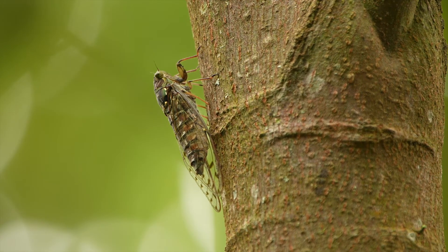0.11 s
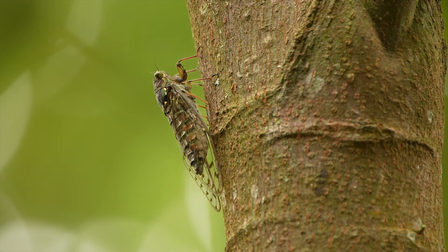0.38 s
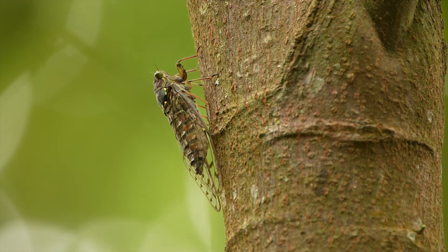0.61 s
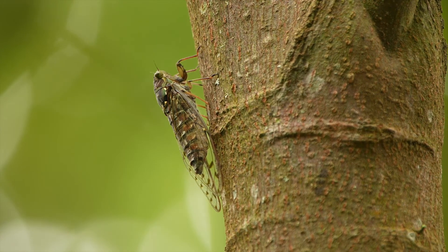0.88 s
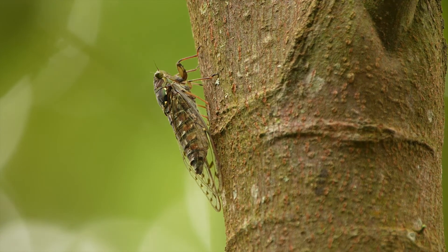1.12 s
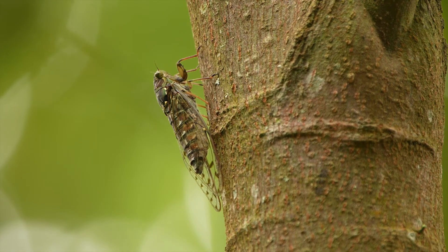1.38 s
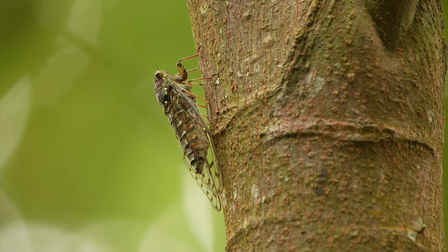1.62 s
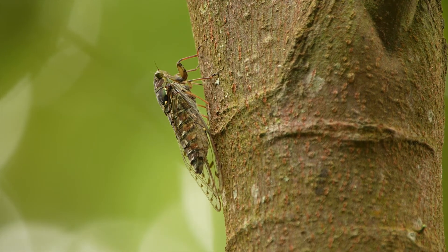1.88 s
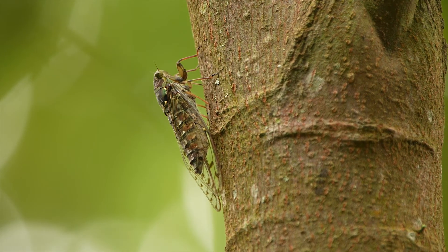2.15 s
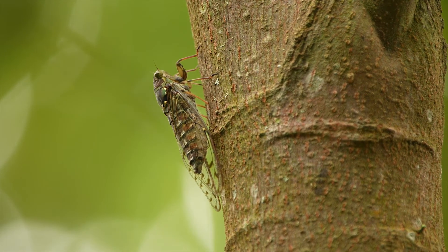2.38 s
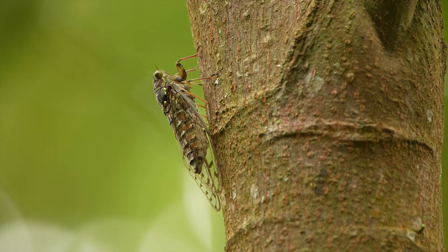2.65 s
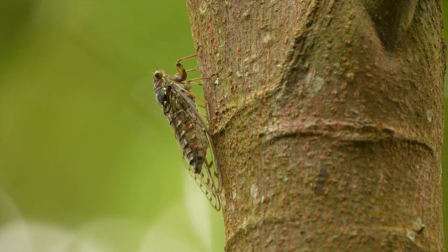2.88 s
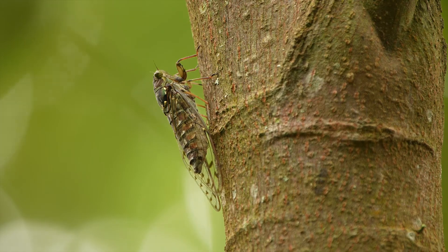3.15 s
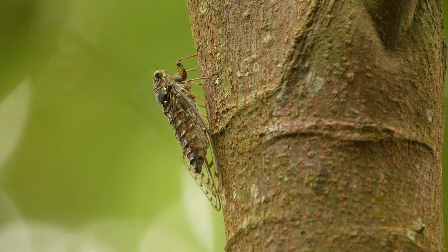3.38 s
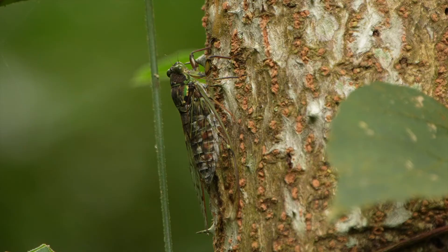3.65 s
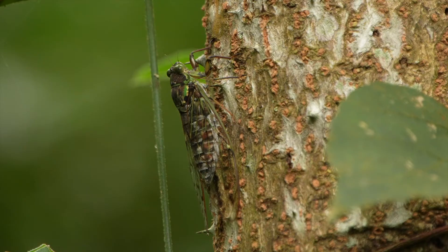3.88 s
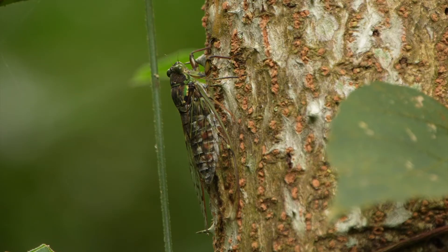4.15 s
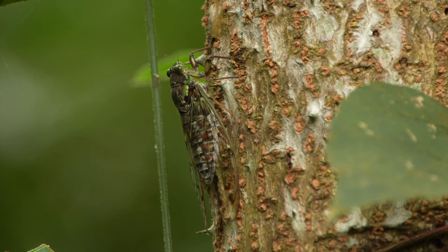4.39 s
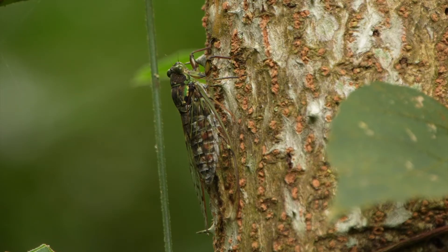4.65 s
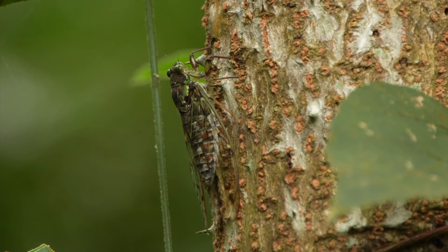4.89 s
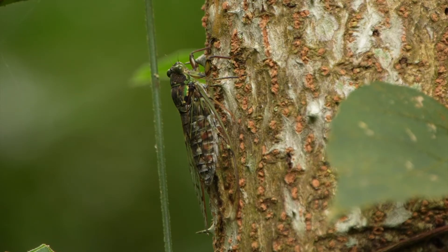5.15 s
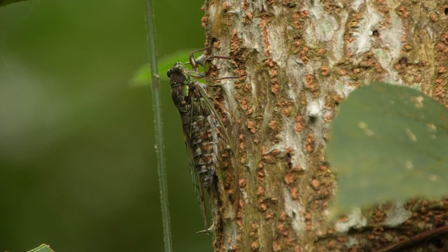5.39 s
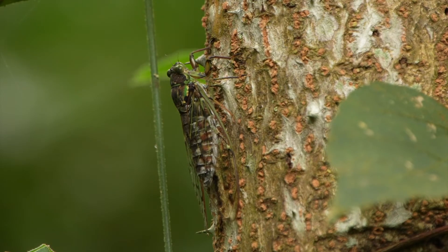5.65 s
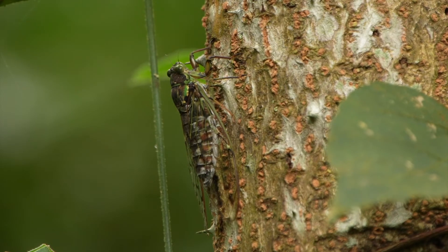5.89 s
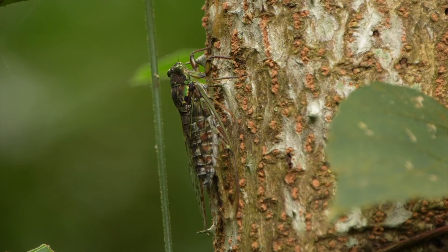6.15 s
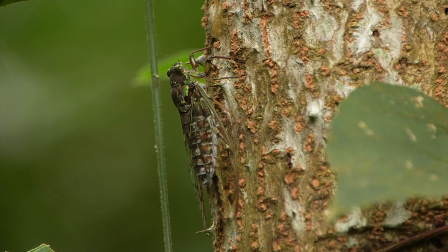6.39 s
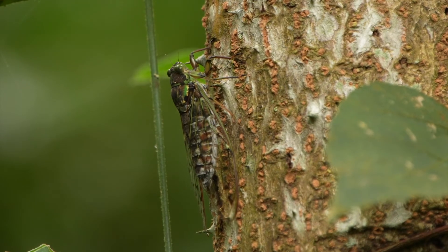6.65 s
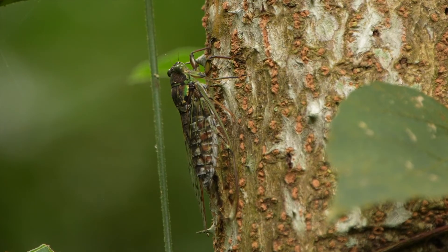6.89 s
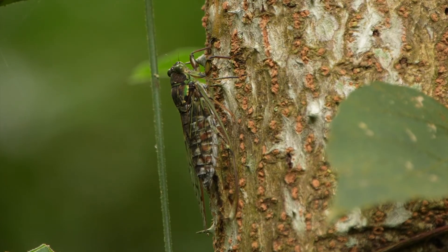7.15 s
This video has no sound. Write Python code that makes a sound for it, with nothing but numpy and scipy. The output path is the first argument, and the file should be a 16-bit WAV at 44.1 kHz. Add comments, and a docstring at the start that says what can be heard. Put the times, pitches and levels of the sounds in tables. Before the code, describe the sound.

Close cicada on a tree trunk gives crisp, rasping chirps about seven a second, slowly fading while a second, faster and shriller cicada rises. Midway the spot changes abruptly: a third starts softly, then swells into loud, drawn-out buzzing with hardly any gaps. Far cicadas drone steadily, and faint wavering crickets join at the second spot. Outdoor forest, mono, close microphone, short diffuse echo from trunks.

```python
"""Near cicadas chirp on forest trees: each chirp is a burst of tymbal buckles, each buckle a quick run of rib clicks.
Three sing in turn, overlapping; the last draws its chirps out, faster and louder, at a second listening spot.
A neighbour buzzes behind the trees by the same clicks, mostly as echo; pulse trains make far, unbroken drones.
Coloured and narrow-band noise makes the far chorus, faint insect bands, low murmur and rumble of each spot.
At the second spot crickets add two wavering sine tones an octave apart."""
import sys
import numpy as np
from scipy import signal
from scipy.fft import rfft, irfft, next_fast_len
from scipy.io import wavfile
from scipy.ndimage import uniform_filter1d, map_coordinates

SR = 44100
rng = np.random.default_rng(int(sys.argv[2]) if len(sys.argv) > 2 else 0)


def linear_from_db(decibels):
    """Turn decibels (scalar or array-like) into linear amplitude factors; 0 gives 1."""
    return 10 ** (np.asarray(decibels, float) / 20)


def to_wav(s):
    """Save 16-bit WAV."""
    ch = np.atleast_2d(s).T  # columns
    pcm = np.round(np.clip(ch, -1, 1) * 32767)  # PCM
    wavfile.write(sys.argv[1], SR, pcm.astype(np.int16))


N = 321048

MOVE_S = 3.7  # the listener changes spot (s)

# Chirps of each near singer: start_s, buckles (count)
FIRST_CHIRPS = [(.003, 1), (.1103, 6), (.2442, 6), (.3982, 6), (.5327, 7), (.6892, 6), (.8344, 6),
                (.9629, 7), (1.1023, 7), (1.2338, 6), (1.3731, 7), (1.5085, 7), (1.6392, 7), (1.7826, 9),
                (1.9259, 6), (2.0652, 6), (2.2052, 6), (2.3487, 7), (2.539, 5), (2.7294, 6), (2.9063, 5),
                (3.074, 5), (3.214, 5), (3.343, 6), (3.462, 7), (3.64, 6)]
SECOND_CHIRPS = [(1.8812, 2), (1.9616, 2), (2.0396, 2), (2.1127, 3), (2.1889, 3), (2.2728, 3), (2.3527, 5),
                 (2.4338, 5), (2.5041, 5), (2.5732, 6), (2.6541, 5), (2.7232, 6), (2.7944, 6), (2.8607, 7),
                 (2.9313, 8), (3.0048, 7), (3.0753, 7), (3.1462, 7), (3.2152, 7), (3.2865, 8), (3.3592, 9),
                 (3.4326, 7), (3.5091, 8), (3.5837, 8), (3.6586, 8)]
THIRD_CHIRPS = [(3.7184, 6), (3.856, 5), (3.9898, 5), (4.118, 5), (4.2469, 5), (4.3761, 5), (4.5048, 5),
                (4.6308, 5), (4.7568, 5), (4.8918, 5), (5.0094, 6), (5.1444, 4), (5.2712, 5), (5.3895, 4),
                (5.495, 3), (5.6012, 4), (5.7076, 3), (5.8112, 4), (5.9118, 4), (6.0102, 6), (6.1036, 6),
                (6.197, 7), (6.2863, 7), (6.3684, 9), (6.4579, 9), (6.536, 10), (6.6158, 11), (6.6879, 15),
                (6.7722, 15), (6.8514, 16), (6.9308, 14), (7.013, 1), (7.0206, 11), (7.1059, 9),
                (7.1686, 1), (7.1762, 6), (7.205, 3), (7.2642, 4)]
# Nominal wait between buckles, short in a crisp chirp, longer in a drawn-out one: time_s, wait_s
FIRST_WAIT = [(0, .00402)]
SECOND_WAIT = [(1.9, .0032), (2.4, .0033), (2.8, .00346), (3.7, .0035)]
THIRD_WAIT = [(3.7, .00397), (4.7, .00392), (5.4, .00377), (6.2, .0038), (6.55, .00387), (6.85, .00407),
              (7.28, .0041)]
# Drive level of each song, ahead of the body's resonances: time_s, level_db
FIRST_LEVEL = [(0, -13.5), (.7, -16.5), (2.2, -17.5), (2.5, -20.5), (2.9, -19.5), (3.2, -22), (3.7, -27)]
SECOND_LEVEL = [(1.9, -22), (2.1, -21), (3.7, -19.5)]
THIRD_LEVEL = [(3.72, -22.5), (3.9, -21.5), (4.5, -24), (5.05, -19.5), (5.36, -14.5), (5.5, -8), (5.71, -4),
               (5.92, -2.9), (6.05, -3.5), (6.25, -4), (7.28, -3.5)]
# Mean rate of rib clicks within a buckle, set by the tymbal's tension: time_s, rib_rate_hz
FIRST_RIBS = [(0, 2853), (3, 2800)]
SECOND_RIBS = [(2, 3120), (3.7, 3090)]
THIRD_RIBS = [(3.701, 2700), (5.199, 2815), (5.7, 2820), (6.2, 2888), (7.28, 2840)]
# Strength of successive ribs in a slack and in a taut buckle: level_db
SLACK_BUCKLE = [-9, -2, 0, -1.5, -7, -15]
TAUT_BUCKLE = [-34, -19, 0, -.3, -17, -28]
# Colour of one rib click: frequency_hz, level_db
FIRST_CLICK = [(1200, -52), (2200, -3), (3000, 2), (5700, -4), (7200, 2.5), (8500, -1), (10300, -2),
               (11300, -7), (12700, -18), (14000, -26), (16000, -29)]
SECOND_CLICK = [(2000, -25), (3200, -5), (4800, -4), (6300, -5.5), (7500, 4), (9300, -2), (10500, 8.5),
                (11200, -2), (12500, -15), (14000, -17), (16000, -43)]
THIRD_CLICK = [(1200, -39), (2300, -7), (3000, -6), (4300, 6), (5700, -9), (6900, 1.5), (7700, 2.5),
               (8600, -2.5), (9500, 5), (10150, -5.5), (10600, -1), (11500, -7.5), (12750, -3.5),
               (13200, -20), (14500, -15.5), (15700, -24), (16500, -47)]
# The body as effort changes: time_s, tautness (0-1), abdomen_hz, low_partials_db, abdomen_ring_db
FIRST_BODY = [(0, 0.18, 2800, 0, -25), (3.7, 0.26, 2807, 1, -17)]
SECOND_BODY = [(2, 0.87, 3168, 0, -3), (3.7, 1, 3168, 0, 6)]
THIRD_BODY = [(3.7, 0.11, 3185, 7.5, -9), (4.8, 0.11, 3185, 9, 1), (5.3, .23, 3185, 4, 8),
              (5.7, 0.31, 3185, -1, 7), (6.1, 0.56, 3185, 0, 8.5), (6.672, 0.45, 3185, -1, 13),
              (6.76, 0.78, 3090, -0.5, 8), (7.28, 0.73, 3125, -1.5, 11)]
# Echo among trunks: frequency_hz, t60_s
TREES = [(2000, 0.16), (5000, 0.24), (9000, 0.3), (10500, 0.16), (14000, 0.12)]
# Singer behind the trees, level ahead of throb and echo: time_s, level_db
NEIGHBOUR_LEVEL = [(0, -59), (1.2, -61), (3.4, -52.5), (3.68, -49), (3.72, -87), (4.3, -54.5), (5.1, -46),
                   (5.39, -49), (5.6, -49), (5.7, -45)]
# Two far buzzers, mean pulses a second: pulse_rate_hz
DRONE_HZ = [253.1, 257.5]
# Their mean levels: time_s, first_level_db, second_level_db
DRONE_LEVEL = [(0, -54, -68), (.75, -50.5, -53.5), (1.5, -51.5, -50), (2.4, -48.5, -49), (2.9, -52, -52),
               (3.69, -49.5, -51)]
# Colour of one drone pulse: frequency_hz, level_db
DRONE_BODY = [(1000, -51), (1270, -11.5), (1780, -3.5), (2030, -5), (2550, 0.5), (2800, -1.5), (3050, -6),
              (3570, -13.5), (4700, -6), (6500, -47)]
# Far chorus, one colour per spot: frequency_hz, relative level_db per Hz
CHORUS = [
    [(650, -39), (1100, -37), (1240, -11.5), (1680, 2), (2130, -9.5), (2730, 0), (3010, 0), (4030, -17),
     (4830, -8.5), (7060, -16), (8540, -11), (10000, -21.5), (11300, -25), (12900, -32), (16000, -34)],
    [(620, -79), (1050, -23), (1480, 5.5), (2180, -11.5), (2900, 0.5), (3600, -10.5), (3980, -2.5),
     (4840, -9.5), (5540, -4.5), (6730, -15), (8170, -11), (10500, -11.5), (11800, -27), (15100, -18.5),
     (16000, -23.5)],
]
# Its level at each spot: level_db
CHORUS_DB = [-46, -43]
# Low murmur, one colour per spot: frequency_hz, relative level_db per Hz
MURMUR = [
    [(15, -25), (25, 0), (76, 5), (102, -34), (139, -7.5), (369, -2.5), (1150, -8), (1500, -47),
     (2530, -120)],
    [(15, -44), (25, -7), (54, 2.5), (118, -3.5), (291, -7), (375, -6), (924, -9.5), (1100, -10.5),
     (1430, -27), (2420, -120)],
]
# Its level at each spot: level_db
MURMUR_DB = [-64.5, -58.5]
# Fainter insect bands at each spot: centre_hz, width_hz of each filter pass, mean level_db
BANDS = [
    [(1240, 75, -78.5), (1747, 130, -74), (3566, 71, -64), (3764, 11, -68), (4814, 300, -59),
     (5800, 46, -65)],
    [(1219, 47, -62.5), (3890, 200, -56.5), (4200, 45, -58.5), (5200, 460, -68.5), (15400, 900, -62)],
]
# Far rumble at each spot: mean level_db
RUMBLE_DB = [-70, -66.5]
# Crickets' two notes, mean levels ahead of echo: time_s, upper_level_db, lower_level_db
WHISTLE_LEVEL = [(3.7, -53, -59), (3.94, -46, -53), (4.5, -45.5, -55.5), (5.5, -51, -55), (5.8, -47.5, -59),
                 (6.05, -45.5, -51), (6.66, -44, -59), (7.28, -46, -55)]
# Upper note's slow pitch course, about which it wavers: time_s, pitch_hz
WHISTLE_HZ = [(3.7, 3990), (4.4, 4035), (5.2, 3995), (5.6, 3960), (7.28, 3945)]

FIRST_SAC, SECOND_SAC, THIRD_SAC = 650, 230, 177  # width of the hollow abdomen's ring (Hz)
UNEVEN_S, UNEVEN_DB = .00003, .5  # scatter of buckle times (s) and sizes (dB)
HESITATION = .22  # scatter of the wait ahead of rounding (swings)
# Scatter of a taut tymbal's rib times (steps) and rate (share); of rib sizes at any tension (dB)
RIB_SLACK, RIB_DRIFT, RIB_DB = .012, .006, .7
LOOSE_SCATTER = 3  # a fully slack tymbal scatters rib times and rate this many times more


def unit(x):
    """Scale to rms 1."""
    return x / np.sqrt(np.mean(x ** 2) + 1e-20)


def along(points, hz):
    """Read (Hz, value) points on a log frequency axis."""
    f, v = np.transpose(points)
    return np.interp(np.log(hz + 1), np.log(f + 1), v)


def at_times(points, s):
    """Read (s, value) points at the given times."""
    return np.interp(s, *np.transpose(points))


def curves(rows):
    """One dB value per sample for each column, silent outside the rows."""
    s, *cols = np.transpose(rows)
    return [np.interp(np.arange(N) / SR, s, c, -120, -120) for c in cols]


def wobble(rate):
    """A smooth random curve, rate knots a second."""
    knots = rng.standard_normal(int(N * rate / SR) + 4)
    return map_coordinates(knots, [np.arange(N) * rate / SR])


def filtered(x, response):
    """Shape x by a complex response of frequency."""
    m = 2 * next_fast_len(N // 2 + 4096)
    return irfft(rfft(x, m) * response(np.fft.rfftfreq(m, 1 / SR)), m)[:N]


def causal(points):
    """The minimum-phase response with these levels: it rings only after its blow."""
    def response(hz):
        cepstrum = irfft(np.log(linear_from_db(along(points, hz))))
        cepstrum[1:len(hz) - 1] *= 2
        cepstrum[len(hz):] = 0
        return np.exp(rfft(cepstrum))
    return response


def resonance(f, hz, width):
    """One causal resonance with unit gain at its peak."""
    return 1j * f * width / (hz * hz - f * f + 1j * f * width)


def narrow(hz, width):
    """Noise of rms 1 in a steep narrow band, passed twice through one resonance."""
    return unit(filtered(rng.standard_normal(N), lambda f: resonance(f, hz, width) ** 2))


def impulses(s, size):
    """Impulses between samples, drawn as short windowed sincs."""
    at = s.ravel() * SR
    k = np.floor(at)[:, None] + np.arange(-7, 9)
    d = k - at[:, None]
    taps = size.ravel()[:, None] * np.sinc(d) * np.cos(np.pi * d / 16) ** 2
    inside = (k >= 0) & (k < N)
    return np.bincount(k[inside].astype(int), taps[inside], N)


def buckles(s, db, rib_hz, taut, click):
    """Each buckle snaps its ribs in turn, fewer of them strong when taut; the clicks take the tymbal's colour."""
    count = len(SLACK_BUCKLE)
    chance = rng.standard_normal((len(s), 1 + 2 * count))
    loose = LOOSE_SCATTER ** (1 - taut[:, None])
    ribs_db = np.outer(1 - taut, SLACK_BUCKLE) + np.outer(taut, TAUT_BUCKLE)
    steps = np.arange(count) - (count - 1) / 2 + RIB_SLACK * loose * chance[:, 1:1 + count]
    rate_hz = rib_hz[:, None] * (1 + RIB_DRIFT * loose * chance[:, :1])
    times = s[:, None] + steps / rate_hz
    sizes = linear_from_db(db[:, None] + ribs_db + RIB_DB * chance[:, 1 + count:])
    return -filtered(impulses(times, sizes), causal(click))


def body(clicks, sac_hz, width, low_db, ring_db):
    """The low partials follow low_db; the abdomen rings on, blending between its lowest and highest pitch."""
    lowest, highest = np.min(sac_hz), np.max(sac_hz)
    low = filtered(clicks, lambda f: 1 / (1 + (f / 6800) ** 8) + 2.2 * resonance(f, 2700, 800))
    deep = filtered(clicks, lambda f: resonance(f, lowest, width))
    high = filtered(clicks, lambda f: resonance(f, highest, width))
    share = (sac_hz - lowest) / (highest - lowest + 1)
    ring = deep + share * (high - deep)
    return clicks + (linear_from_db(low_db) - 1) * low + linear_from_db(ring_db) * ring


def echoes(x):
    """A diffuse answer of the trunks, 4 ms late, redrawn every third of a second as the air moves."""
    out, hop = np.zeros(N + SR), SR // 3
    for start in range(0, N, hop):
        hz, t, z = signal.stft(rng.standard_normal(SR // 2), SR, nperseg=256)
        decay = linear_from_db(-60 * t / along(TREES, hz)[:, None])
        tail = signal.istft(z * decay, SR, nperseg=256)[1]
        wet = signal.fftconvolve(x[start:start + hop], tail / np.linalg.norm(tail))
        out[start:start + len(wet)] += wet
    return np.pad(out, (round(.004 * SR), 0))[:N]


def singer(chirps, wait, level, ribs, click, width, effort, wet_db, swell_db):
    """A near cicada: each buckle falls a whole number of abdomen swings into its chirp, now one more, now one less.

    wet_db sets the echo; swell_db is the rise from one buckle to the next."""
    start, k, n = np.transpose([(s, k, n) for s, n in chirps for k in range(n)])
    t, taut, sac_hz, low_db, ring_db = np.transpose(effort)
    chance = rng.standard_normal((len(start), 3))
    swing_hz = np.interp(start, t, sac_hz)
    swings = np.round(k * at_times(wait, start) * swing_hz + HESITATION * chance[:, 2])
    s = start + swings / swing_hz + UNEVEN_S * chance[:, 0]
    db = at_times(level, start) + swell_db * (k - (n - 1) / 2) + UNEVEN_DB * chance[:, 1]
    tautness = np.clip(np.interp(s, t, taut), 0, 1)
    clicks = buckles(s, db, at_times(ribs, s), tautness, click)
    now = np.arange(N) / SR
    sac_now, low_now, ring_now = (np.interp(now, t, c) for c in (sac_hz, low_db, ring_db))
    direct = body(clicks, sac_now, width, low_now, ring_now)
    return direct + linear_from_db(wet_db) * echoes(direct)


def beats(rate_hz, drift):
    """Times of a steady train whose rate wanders by the share drift."""
    turns = np.cumsum(rate_hz * (1 + drift * wobble(14))) / SR
    return np.interp(np.arange(1, int(turns[-1])), turns, np.arange(N) / SR)


def neighbour():
    """A taut tymbal buckling without a break behind the trees: its level throbs and most of it is echo."""
    s = beats(rate_hz=np.full(N, 245.5), drift=.012)
    still = np.zeros_like(s)
    clicks = buckles(s, still, still + 2950, still + 1, THIRD_CLICK)
    throb_db = 5.1 * np.sin(2 * np.pi * 10.8 * np.arange(N) / SR + 1.4)  # its chirps run together
    voice = unit(body(clicks, sac_hz=3185, width=127, low_db=2.5, ring_db=11.5))
    direct = linear_from_db(curves(NEIGHBOUR_LEVEL)[0] + throb_db) * voice
    return linear_from_db(-9.5) * direct + echoes(direct)


def drone():
    """Unbroken buzzes far off: each pulse rate shows as a comb of blurred lines."""
    out = np.zeros(N)
    for hz, level_db in zip(DRONE_HZ, curves(DRONE_LEVEL)):
        s = beats(np.full(N, hz), drift=.0045)
        sizes = linear_from_db(2 * rng.standard_normal(len(s)))
        buzz = filtered(impulses(s, sizes), causal(DRONE_BODY))
        out += linear_from_db(level_db + 1.33 * wobble(8.3)) * unit(echoes(buzz) + linear_from_db(-0.5) * buzz)
    return out


def hiss(spectrum, patchy_db):
    """Coloured noise of rms 1 with patches of random gain over time and frequency."""
    z = signal.stft(rng.standard_normal(N + 512), nperseg=512)[2]
    field = uniform_filter1d(rng.standard_normal(z.shape), size=4, axis=0)
    field = uniform_filter1d(field, size=10, axis=1)
    noise = signal.istft(z * linear_from_db(patchy_db * unit(field)), nperseg=512)[1][:N]
    return unit(filtered(noise, lambda f: linear_from_db(along(spectrum, f))))


def far_chorus(spot):
    """Many distant singers merged into coloured noise."""
    return linear_from_db(CHORUS_DB[spot]) * hiss(CHORUS[spot], patchy_db=0.05)


def murmur(spot):
    """The low forest murmur as coloured noise."""
    return linear_from_db(MURMUR_DB[spot]) * hiss(MURMUR[spot], patchy_db=-0.27)


def insect_bands(spot):
    """Faint insects as narrow noise bands, each wavering in level."""
    return sum(linear_from_db(db + 2.2 * wobble(4.6)) * narrow(hz, width) for hz, width, db in BANDS[spot])


def rumble(spot):
    """A low noise band that comes and goes."""
    return linear_from_db(RUMBLE_DB[spot] + 2.1 * wobble(2.37)) * narrow(hz=109.5, width=79)


def forest():
    """The bed of each spot, fading over from one to the next at equal power."""
    here, there = (far_chorus(k) + murmur(k) + insect_bands(k) + rumble(k) for k in range(2))
    moved = np.clip((np.arange(N) / SR - MOVE_S) / 0.039 + .5, 0, 1)  # 39 ms crossfade
    return np.sqrt(1 - moved) * here + np.sqrt(moved) * there


def whistle():
    """Crickets on one note and the octave below: the pitch wavers fast, the level flutters."""
    hz = at_times(WHISTLE_HZ, np.arange(N) / SR) * (1 + 0.00634 * wobble(70))
    phase = np.pi * np.cumsum(hz) / SR  # of the lower note
    upper_db, lower_db = curves(WHISTLE_LEVEL)
    upper = linear_from_db(upper_db + 2.5 * wobble(30)) * np.sin(2 * phase)
    lower = linear_from_db(lower_db + 2.7 * wobble(25)) * np.sin(phase)
    return upper + lower + linear_from_db(-7.5) * echoes(upper + lower)


def scene():
    """Three near singers, a neighbour, far drones, the forest bed and the crickets."""
    first = singer(FIRST_CHIRPS, FIRST_WAIT, FIRST_LEVEL, FIRST_RIBS, FIRST_CLICK, FIRST_SAC, FIRST_BODY,
                   wet_db=-9.0, swell_db=.4)
    second = singer(SECOND_CHIRPS, SECOND_WAIT, SECOND_LEVEL, SECOND_RIBS, SECOND_CLICK, SECOND_SAC, SECOND_BODY,
                    wet_db=-10.5, swell_db=-0.1)
    third = singer(THIRD_CHIRPS, THIRD_WAIT, THIRD_LEVEL, THIRD_RIBS, THIRD_CLICK, THIRD_SAC, THIRD_BODY,
                   wet_db=-6.5, swell_db=-0.04)
    mix = first + second + third + neighbour() + drone() + forest() + whistle()
    return mix[None]


def low_pass(x):
    """Removes everything above the highest recorded frequency."""
    return signal.sosfilt(signal.butter(12, 16520, fs=SR, output="sos"), x)


def record(dry):
    """The microphone chain falls away steeply above its band edge at 15730 Hz, down to a small remainder."""
    mix = filtered(dry[0], lambda f: .08 + .92 / (1 + (f / 15730) ** 200))[None]
    return low_pass(mix)


dry = scene()
out = record(dry)
to_wav(out)
```